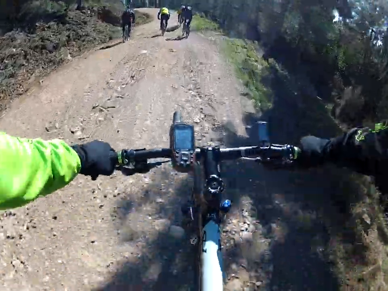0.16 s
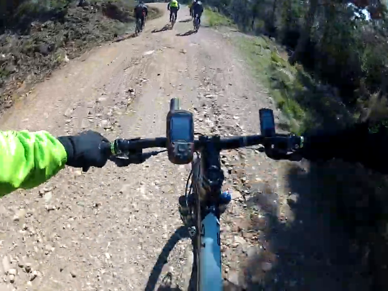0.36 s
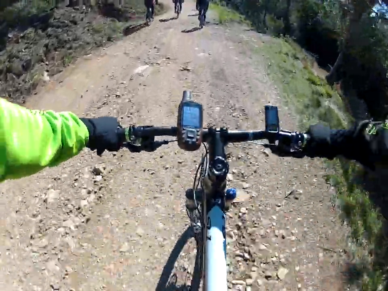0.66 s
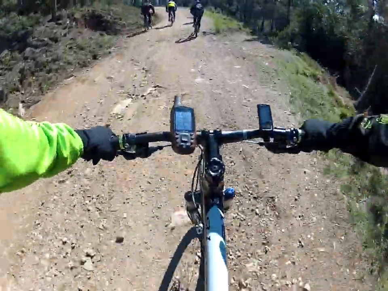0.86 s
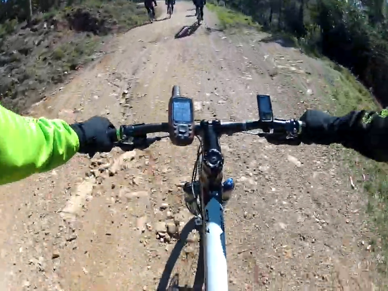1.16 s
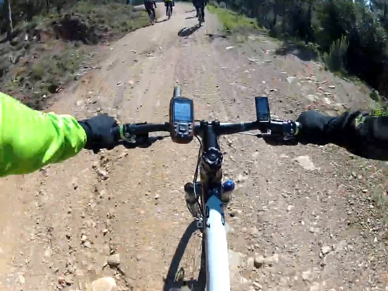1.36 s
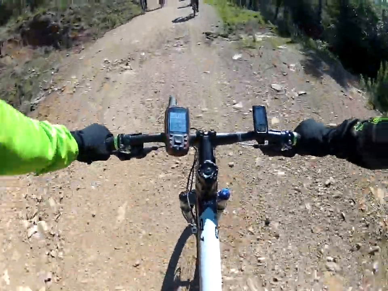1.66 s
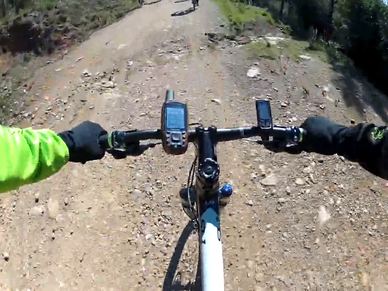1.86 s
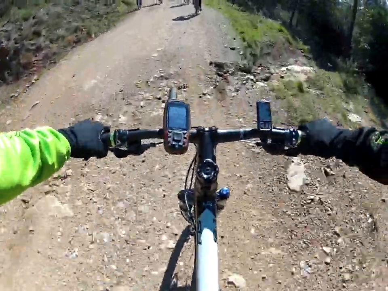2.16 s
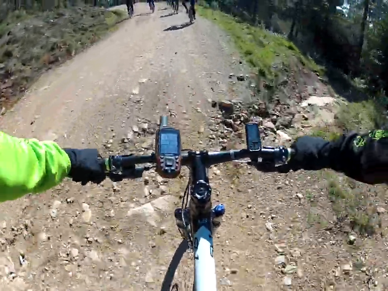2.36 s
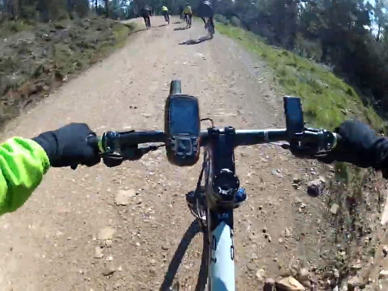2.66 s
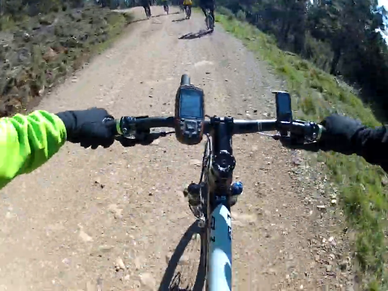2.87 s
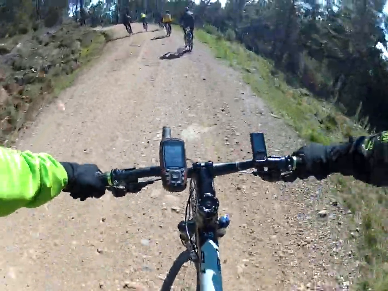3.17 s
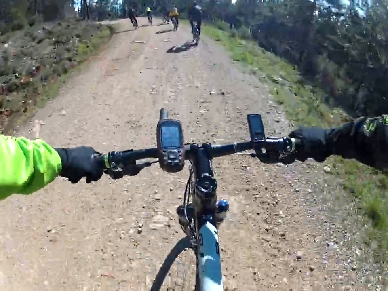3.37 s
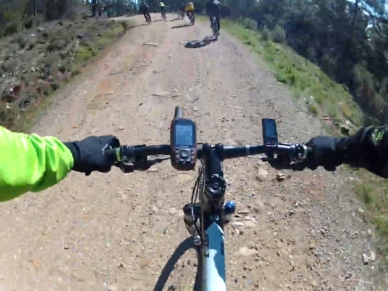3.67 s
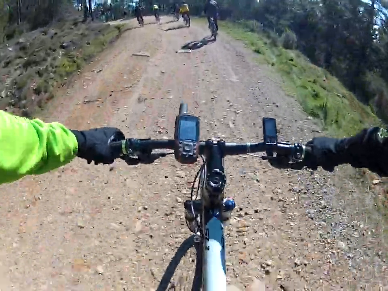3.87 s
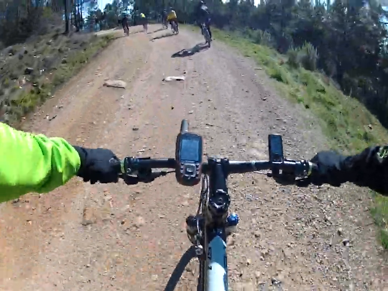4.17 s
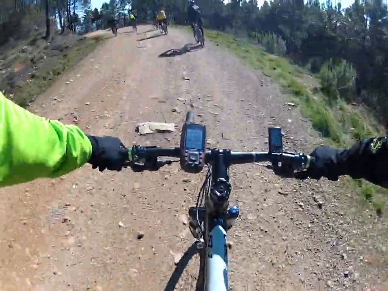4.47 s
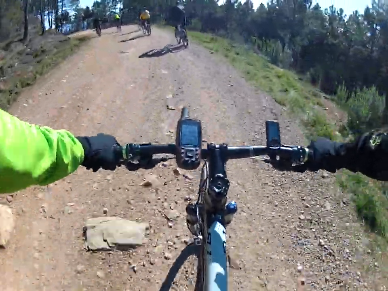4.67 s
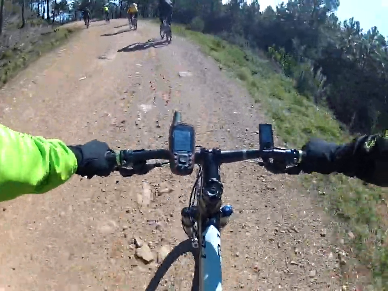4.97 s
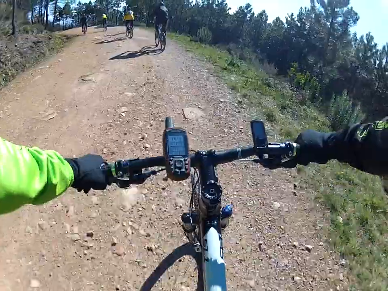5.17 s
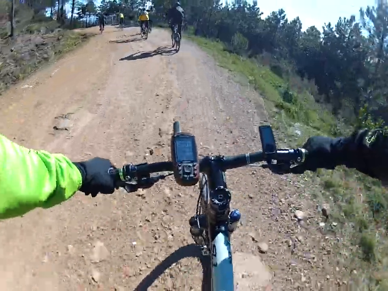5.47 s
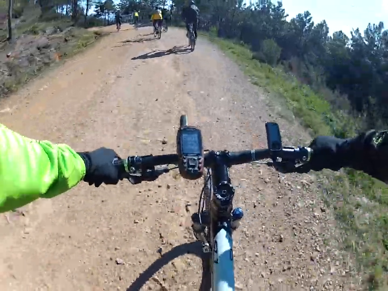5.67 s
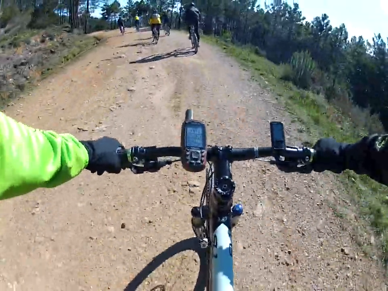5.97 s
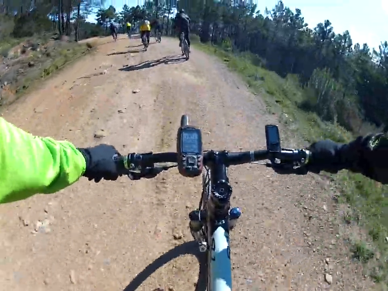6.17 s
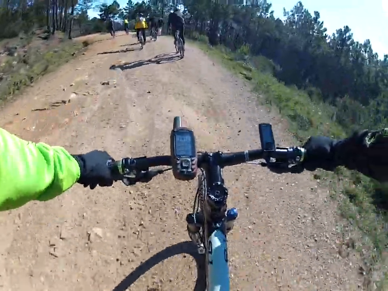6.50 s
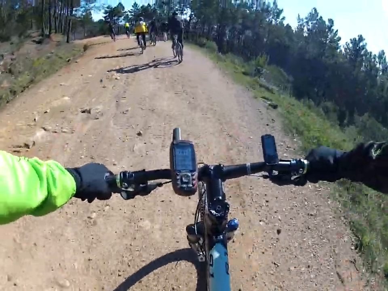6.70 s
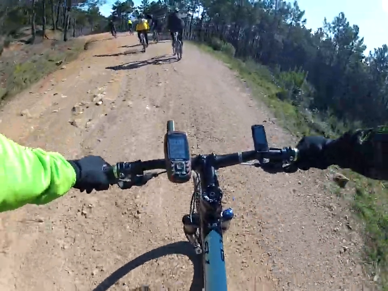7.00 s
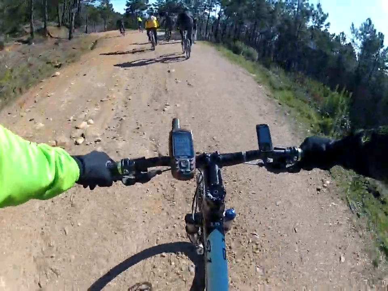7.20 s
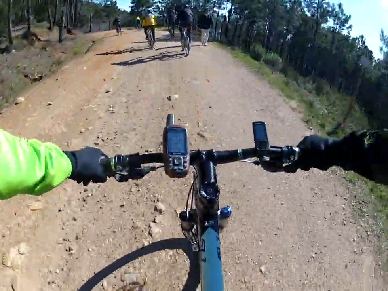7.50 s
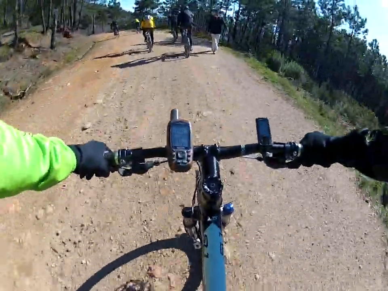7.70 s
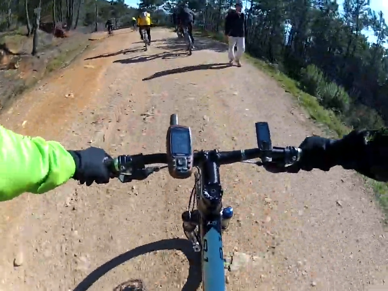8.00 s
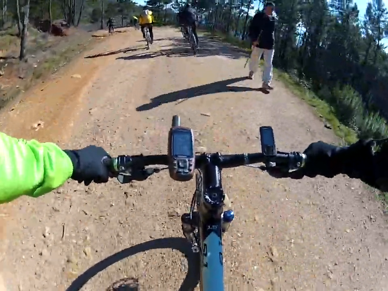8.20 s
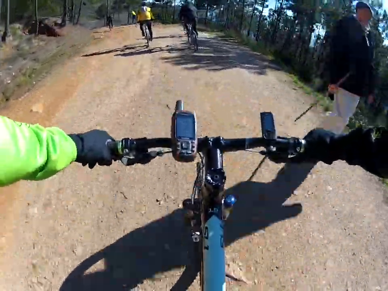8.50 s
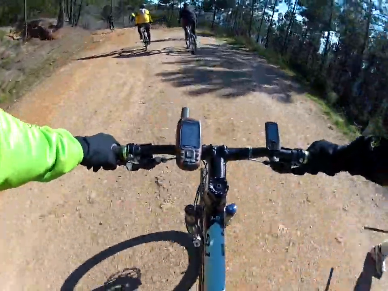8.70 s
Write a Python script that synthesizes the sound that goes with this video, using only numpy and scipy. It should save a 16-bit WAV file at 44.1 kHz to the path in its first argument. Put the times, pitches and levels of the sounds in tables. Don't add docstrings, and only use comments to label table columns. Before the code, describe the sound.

A bicycle rolls down a stony outdoor track, heard close and dry from inside a closed plastic case on the rider's chest. Throughout, low wind flutter and lumpy tyre rumble sit beneath a fine gritty rattle, faint harness creaks and a short hollow buzz from frame and stem. Sharp snaps and stone raps crowd 0.4-0.55 s, with a heavy frame thud near 0.53. More ticks follow at 1.3-1.7, including a hard click at 1.72. Scattered taps continue around 2.5 and 3.5. From 4.1 to 4.3 come bright double snaps and spitting grit. Coarse rumble eases after 4.4, while fine grit swells near 4.9. Brief air bumps push the case. Crisp raps cluster at 6.45-6.7, another falls at 7.04, a snap at 7.47, and rumble partly returns. Knocks at 8.25 and 8.82 close the still-moving ride. The treble is grainy and mirrored, without echo.

```python
import sys
import numpy as np
from scipy import signal
from scipy.fft import rfft, irfft, next_fast_len
from scipy.io import wavfile
from scipy.ndimage import uniform_filter1d, map_coordinates

SR = 44100
rng = np.random.default_rng(int(sys.argv[2]) if len(sys.argv) > 2 else 0)


def inscribe(sig):
    pcm = np.round(np.clip(np.atleast_2d(sig).T, -1, 1) * 32767)
    wavfile.write(sys.argv[1], SR, pcm.astype(np.int16))


def elevation(decibels):
    levels = np.asarray(decibels, float)
    return 10 ** (levels / 20)


N = 390285

# time in seconds, strength in dB.
WIND_STRENGTH = [(0.0, -28.5), (0.07, -38.5), (0.98, -34), (1.01, -43.5), (1.43, -36.5), (1.45, -30),
                 (1.53, -32), (3.01, -43), (5.05, -32.5), (5.2, -55), (5.27, -36), (5.35, -50), (5.49, -33),
                 (6.51, -45.5), (6.56, -30.5), (6.68, -47.5), (7.61, -36), (8.85, -41.5)]
# frequency in Hz, level in dB per Hz.
WIND_COLOUR = [(7.1, -42), (12, 7), (32, 2.5), (90, -23), (120, -41), (200, -120)]
# time in seconds, peak in dB, length in seconds.
CASE_BUMPS = [(0.264, -25, 0.0088), (0.507, -21, 0.0068), (1.442, -17.5, 0.0054), (3.901, -21, 0.0043),
              (4.46, -25, 0.012), (4.758, -15.5, 0.006), (4.987, -21, 0.008), (5.487, -29, 0.012),
              (6.16, -48, 0.0089), (6.32, -28.5, 0.011), (6.544, -38, 0.0068), (7.501, -33, 0.0071),
              (7.838, -30, 0.012), (3.995, -23.5, 0.011), (7.027, -34, 0.0079), (7.348, -28.5, .012),
              (8.077, -34, 0.0232)]
# time in seconds, coarse stones in dB, fine grit in dB.
TRACK_SURFACE = [(0.0, -50, -54.5), (0.71, -45.5, -53), (1.18, -52, -54.5), (1.53, -44.5, -53),
                 (1.95, -50, -51), (2.39, -47.5, -52), (4.07, -50.5, -52.5), (4.46, -59.5, -53),
                 (4.88, -55, -49), (6.11, -59, -54), (6.33, -56.5, -53.5), (6.56, -55.5, -52),
                 (6.97, -58.5, -57), (7.27, -50.5, -55), (7.49, -52, -53.5), (7.84, -55.5, -56),
                 (8.28, -51, -55.5), (8.85, -52, -58)]
# time in seconds, roughness in dB, half length in seconds.
TRACK_PATCHES = [(0.286, 4, 0.033), (0.382, -3.5, 0.035), (0.483, 6, 0.034), (0.652, -4, 0.027),
                 (0.744, 3, 0.034), (1.073, -1, 0.041), (1.363, 5.5, 0.043), (2.068, -3.5, 0.027),
                 (2.307, -3.5, .06), (2.5, 3.5, .05), (2.78, -4, 0.014), (2.93, 1, 0.072),
                 (3.57, -0.5, 0.029), (3.946, -2, 0.023), (4.165, 4.5, 0.05), (4.476, -1.5, 0.036),
                 (4.644, -3.5, 0.037), (5.37, -3, 0.14), (5.907, -2, 0.025), (6.116, 3, 0.032),
                 (6.597, 1, 0.046), (6.84, -5, 0.042), (7.323, -0.5, 0.067), (7.516, 2.5, .04),
                 (7.646, 2, 0.035), (8.184, 2, 0.12)]
# frequency in Hz, level in dB per Hz.
TYRE_COLOUR = [(32, -49), (55, 0.5), (110, -4), (190, -8), (245, -13.5), (330, -18.5), (400, -23),
               (660, -120)]

# frequency in Hz, width in Hz, level in dB.
HARNESS_RESONANCES = [(269, 79, -1.3), (365.6, 71, 0.23)]
TUBE_RESONANCES = [(392, 97, -5), (542, 143, -1.5), (744, 65, -0.5), (867, 142, -7.5)]
STEM_RESONANCES = [(1058.5, 80, 0)]
CASE_RESONANCES = [(1441, 127, -4), (1820, 256, -2.5), (2320, 144, 2.5), (2726, 377, -6), (3372, 240, -4),
                   (4140, 190, -12), (4600, 440, -17), (5210, 67, -16.5)]
COVER_RESONANCES = [(4100, 930, 5), (4670, 320, 2.5), (4790, 100, 7.5), (5390, 490, -2)]

# frequency in Hz, level in dB, time to fade by 60 dB in seconds.
FRAME_NOTES = [(506, -4.5, 0.021), (734, -6, 0.027), (1010, -3, 0.033)]
CLIP_NOTES = [(1552, 0, 0.026)]
SHELL_NOTES = [(1790, -7.5, 0.017), (2310, -9, 0.015)]
LID_NOTES = [(2880, 2.5, 0.018), (3320, 1.5, 0.024), (4060, -9, 0.021)]

# time in seconds, peak in dB, pitch in Hz, tyre thump share in dB.
FRAME_THUDS = [(0.267, -44, 393, -15), (0.421, -36, 241, -16), (0.526, -27, 500, 0.5),
               (0.694, -38, 240, -17), (1.304, -39.5, 360, 2), (1.667, -39, 296, 4.5),
               (1.722, -39, 248, -18), (2.093, -44, 240.6, -7), (2.124, -42, 555, -9),
               (3.092, -45, 283, -2), (3.218, -57, 285, -10.5), (3.455, -36.5, 283, -13),
               (3.55, -38, 318, -7), (3.625, -42.5, 367, -10), (4.041, -45, 357, -3), (4.119, -38, 300, -5),
               (4.558, -45, 290, -6), (4.893, -36, 320, -20), (5.835, -49, 293, -12.5),
               (8.09, -40, 600, -9)]
# time in seconds, peak in dB.
GRIT_SPITS = [(0.0084, -55), (0.439, -45), (0.4818, -49), (0.5402, -52), (1.419, -48), (1.7225, -42.5),
              (2.8529, -51), (2.937, -49), (3.039, -51), (3.347, -46.5), (3.5583, -46), (3.9294, -55),
              (4.0926, -41), (4.15, -36), (4.221, -38), (4.8253, -43), (4.907, -46.5), (7.4729, -53),
              (7.6256, -53), (8.249, -48.5)]
# time in seconds, peak in dB, shell over clip in dB,
# lid over clip in dB, struck spot in Hz.
CLIP_SNAPS = [(0.16, -42, -2, -1, 2120), (0.4834, -33.5, 1, -8, 1860), (0.5258, -28.5, 5.5, -26, 1790),
              (0.5404, -33, -9, -9, 1850), (1.4408, -32.5, -8, -13, 2340), (1.6706, -37, -3, -11, 2370),
              (1.7235, -27.5, -10, -7, 1850), (2.8562, -34.5, 0, -8, 1910), (3.037, -44.5, 1, 6.5, 2370),
              (3.718, -36.5, 3, -13, 2230), (4.0924, -27, -5, -5.5, 2810), (4.118, -44, 1, 7, 2120),
              (4.1532, -28, -6, -8, 2130), (4.221, -31, 1, 0, 2730), (4.2304, -37, 1, -9, 2330),
              (4.388, -38.5, -6, -2, 2760), (4.8913, -34, -8, -7, 1920), (4.9387, -32.5, -10, -6, 2300),
              (7.4739, -33.5, -13, -8, 2200), (8.2483, -32, -12, -13, 1900)]
# time in seconds, peak in dB, lid over shell in dB, struck spot in Hz.
SHELL_RAPS = [(0.396, -30, -6, 2400), (0.4344, -36, -13, 2280), (1.1603, -33.5, -12, 2300),
              (1.4187, -29, -7, 2300), (1.6154, -37, 2.5, 2690), (1.6916, -34, -3, 2330),
              (1.9724, -36.5, -5, 2340), (2.4678, -38, -11, 2360), (2.4902, -33, -3.5, 2320),
              (2.5306, -33, -7, 2240), (2.7174, -37.5, 2, 2330), (3.1812, -35.5, -3, 2310),
              (3.463, -32.5, -8, 2380), (3.5448, -27.5, -23, 2290), (4.1334, -33, -6, 2360),
              (4.2023, -38.5, -2, 2300), (4.3101, -30, -9, 2290), (4.591, -35, -19, 1940),
              (4.8279, -35.5, -6, 2380), (5.913, -29.5, -7, 2320), (6.33, -35.5, -18, 2310),
              (6.4637, -27, -6, 2320), (6.5016, -35, -17, 2320), (6.551, -29.5, -16, 2320),
              (6.6438, -27.5, -10.5, 2350), (6.6772, -33.5, -10, 2320), (7.0264, -38, -8, 2360),
              (7.0414, -30, -6.5, 2330), (8.332, -34, 2, 2270), (8.8174, -29, -6.5, 2370)]
# time in seconds, peak in dB, lid
# over shell in dB.
FURTHER_RAPS = [(0.8604, -37.5, -16), (1.0191, -38.5, -7), (1.1074, -37.5, -6), (1.1463, -38, -11),
                (1.3319, -31, -6), (1.3763, -34, -16), (1.8282, -35.5, -17), (2.0612, -38.5, -3),
                (2.2438, -42, 5), (2.3141, -38, -4.5), (2.3895, -38, -17), (2.9472, -44, -11),
                (3.876, -37.5, -3), (3.9703, -36.5, -4.5), (4.3715, -46, 4), (4.8614, -35, -10),
                (4.9092, -34.5, -10), (5.0335, -45, -8), (5.466, -37, -13), (5.6146, -38, -6),
                (6.542, -33.5, -13), (6.5916, -33.5, -10), (6.8229, -37, -12), (6.9238, -40, 2.5),
                (7.1576, -48, -17), (7.2845, -35.5, -16), (7.3477, -38, -8), (7.993, -37.5, -5),
                (8.2018, -44, -9), (8.2184, -39.5, -1)]

# frequency in Hz, level in dB.
CONVERTER_EDGE = [(300, -9), (450, 2), (5000, 0), (5600, 4), (6000, -2.5)]
# frequency in Hz, level in dB.
TREBLE_LIMIT = [(15250, 0), (15330, -11), (16300, -26)]

HOLD_HZ = 12000
PATCH_GRIT, PATCH_WIND = 0.85, 0.06
TYRE_DB, FRAME_DB, STEM_DB, RATTLE_DB = 2.5, -6.5, -8.5, 0.02
FRAME_STONES, STEM_STONES = 0.86, 0.31
PEBBLES_PER_S, PEBBLE_DB, PEBBLE_S = 45, -9, 0.0029
SPIT_T60_S, SPIT_DB, RAP_SPIT_DB = 0.038, 0.5, -26.5
USUAL_SPOT_HZ = 2310
RAP_CLIP_DB, TICK_CLIP_DB = -20.5, -16
CLIP_DB, SHELL_DB, LID_DB, SCRAPE_DB = 4.5, 2.5, 0.5, 10.5


def unit(x):
    return x / np.sqrt(np.mean(x ** 2) + 1e-20)


def along(points, hz):
    point_hz, point_db = np.transpose(points)
    return elevation(np.interp(np.log(hz + 1), np.log(point_hz + 1), point_db))


def curves(rows):
    s, *columns = np.transpose(rows)
    return [np.interp(np.arange(N) / SR, s, column) for column in columns]


def wobble(rate):
    knots = rng.standard_normal(int(N * rate / SR) + 4)
    return map_coordinates(knots, [np.arange(N) * rate / SR])


def filtered(x, response):
    size = next_fast_len(N + SR // 2)
    spectrum = rfft(x, size) * response(np.fft.rfftfreq(size, 1 / SR))
    return irfft(spectrum, size)[..., :N]


def resonances(modes):
    def response(f):
        total = 0
        for k, (centre, width, db) in enumerate(modes):
            peak = 1j * f * width / (centre ** 2 - f * f + 1j * f * width)
            total = total + (-1) ** k * elevation(db) * peak
        return total
    return response


def converter_edge(x):
    return filtered(x, lambda hz: along(CONVERTER_EDGE, hz))


def patchy(x, depth_db):
    z = signal.stft(x, nperseg=256)[2]
    field = uniform_filter1d(rng.standard_normal(z.shape), size=4, axis=0)
    field = uniform_filter1d(field, size=4, axis=1)
    return signal.istft(z * elevation(depth_db * unit(field)), nperseg=256)[1][:N]


def grit(rate, spread_db, smooth):
    chance, side, size = rng.random((3, N))
    strength = elevation(-spread_db * np.log(size + 0.17))
    taps = (chance < rate / SR) * np.sign(side - .5) * strength
    return np.sqrt(1 - smooth) * unit(taps) + np.sqrt(smooth) * rng.standard_normal(N)


def shaking(level_db, modes, clumps_db, rate, spread_db, smooth, patch_db):
    drive = elevation(clumps_db) * patchy(grit(rate, spread_db, smooth), patch_db)
    return elevation(level_db) * unit(filtered(drive, resonances(modes)))


def add_hit(out, s, modes, attack, detune):
    t = np.arange(SR // 10) / SR
    hz, level, t60 = np.transpose(modes)[:, :, None]
    strength, pitch, phase = rng.standard_normal((3, len(modes), 1))
    fade = elevation(level + 1.36 * strength - 60 * t / t60)
    ring = fade * np.sin(2 * np.pi * hz * (1 + detune * pitch) * t + 1.01 * phase)
    out[round(s * SR):][:len(t)] += ring.sum(0) * (1 - np.exp(-t / attack))


def bursts(rows, attack):
    out, t = np.zeros(N + SR), np.arange(SR // 16) / SR
    for s, db, t60 in rows:
        shape = elevation(db - 60 * t / t60) * (1 - np.exp(-t / attack))
        out[round(s * SR):][:len(t)] += shape * rng.standard_normal(len(t))
    return out[:N]


def wind(level_db):
    buffet = filtered(rng.standard_normal(N), lambda hz: along(WIND_COLOUR, hz))
    air = elevation(level_db + 0.5) * unit(elevation(0.71 * wobble(14)) * buffet)
    t = np.arange(N) / SR
    for s, db, length in CASE_BUMPS:
        u = (t - s - .02) / length
        air += elevation(db) * u * np.exp(-u * u / 2)
    return air


def patches():
    t = np.arange(N) / SR
    return sum(db * np.exp(-.5 * ((t - s) / half) ** 2) for s, db, half in TRACK_PATCHES)


def tyres(level_db):
    roll = filtered(grit(600, 3.9, smooth=0.69), lambda hz: along(TYRE_COLOUR, hz))
    return elevation(level_db + 1.6) * unit(elevation(0.77 * wobble(18)) * roll)


def harness(sway):
    clumps_db = 1.4 * sway + 1.2 * wobble(14)
    return shaking(-60.0, HARNESS_RESONANCES, clumps_db, 300, 0.99, smooth=0.55, patch_db=0.83)


def frame_hum(stones_db, grit_db, jolts):
    level_db = FRAME_STONES * stones_db + (1 - FRAME_STONES) * grit_db + FRAME_DB
    clumps_db = 1.4 * jolts + 1.52 * wobble(12)
    return shaking(level_db, TUBE_RESONANCES, clumps_db, 900, 4.3, smooth=0.71, patch_db=1.3)


def stem_hum(stones_db, grit_db, jolts):
    level_db = STEM_STONES * stones_db + (1 - STEM_STONES) * grit_db + STEM_DB
    return shaking(level_db, STEM_RESONANCES, 2.6 * jolts, 900, 2.8, smooth=0.78, patch_db=2.7)


def thuds():
    out = np.zeros(N + SR)
    for s, db, pitch_hz, thump_db in FRAME_THUDS:
        extra_db = .5 * (db + 30.5) + 1.5
        notes = [(hz, db + extra_db + level, t60) for hz, level, t60 in FRAME_NOTES]
        stone, thump = (pitch_hz, db - 0.5, .05), (110, db + thump_db + 8.5, .06)
        add_hit(out, s, notes + [stone, thump], attack=.0008, detune=.008)
    return out[:N]


def pebbles(grit_db):
    t = np.arange(SR // 50) / SR
    crumble = np.exp(-t / PEBBLE_S) * rng.standard_normal(len(t))
    hits = grit(PEBBLES_PER_S, 2.4, smooth=0)
    drive = hits + 0.42 * patchy(signal.fftconvolve(hits, crumble)[:N], 3.1)
    ring = filtered(drive, resonances(TUBE_RESONANCES + STEM_RESONANCES + CASE_RESONANCES))
    return elevation(grit_db + PEBBLE_DB) * unit(ring)


def spits():
    cover = resonances(COVER_RESONANCES)
    hiss = elevation(-76) * unit(filtered(rng.standard_normal(N), cover))
    rows = [(s, db + SPIT_DB, SPIT_T60_S) for s, db in GRIT_SPITS]
    rows += [(s, db + RAP_SPIT_DB, SPIT_T60_S) for s, db, *_ in SHELL_RAPS]
    return hiss + elevation(7) * filtered(bursts(rows, 0.00055), cover)


def case_rattle(grit_db, jolts):
    clumps_db = 1.26 * jolts + 2.0 * wobble(60)
    return shaking(grit_db + RATTLE_DB, CASE_RESONANCES, clumps_db, 1400, 3.8, smooth=0.25, patch_db=2.15)


def knocks():
    out = np.zeros(N + SR)
    blows = [(s, db, db + shell, db + lid, spot) for s, db, shell, lid, spot in CLIP_SNAPS]
    blows += [(s, db + RAP_CLIP_DB, db, db + lid, spot) for s, db, lid, spot in SHELL_RAPS]
    blows += [(s, db + TICK_CLIP_DB, db, db + lid, USUAL_SPOT_HZ) for s, db, lid in FURTHER_RAPS]
    scrapes = []
    for s, clip_db, shell_db, lid_db, spot_hz in blows:
        parts = [(CLIP_NOTES, clip_db + CLIP_DB),
                 (SHELL_NOTES + [(spot_hz, 0, .018)], shell_db + SHELL_DB),
                 (LID_NOTES, lid_db + LID_DB)]
        notes = [(hz, share + level, t60) for part, share in parts for hz, level, t60 in part]
        contact = 0.0007 * elevation(-.6 * (max(clip_db, shell_db) + 27.5))
        add_hit(out, s, notes, contact, detune=.012)
        scrapes.append((s, lid_db + SCRAPE_DB, .032))
    scrape = patchy(bursts(scrapes, 0.0029), 3.2)
    return out[:N] + filtered(scrape, resonances(CASE_RESONANCES))


def scene():
    buffet_db, = curves(WIND_STRENGTH)
    stones_db, grit_db = curves(TRACK_SURFACE)
    rough_db = patches()
    sway = wobble(9)
    jolts = wobble(32)
    stones_db = stones_db + rough_db + 1.04 * sway
    grit_db = grit_db + PATCH_GRIT * rough_db
    gusts_db = buffet_db + PATCH_WIND * rough_db + 1.24 * sway + 0.46 * wobble(5.5)
    soft = wind(gusts_db) + tyres(stones_db + TYRE_DB) + harness(sway) + thuds()
    hard = frame_hum(stones_db, grit_db, jolts) + stem_hum(stones_db, grit_db, jolts)
    hard += pebbles(grit_db) + spits() + case_rattle(grit_db, jolts) + knocks()
    return (soft + converter_edge(hard))[None]


def band_limit(x):
    return signal.sosfilt(signal.butter(12, 15950, fs=SR, output="sos"), x)


def record(dry):
    base = filtered(dry, lambda hz: hz < HOLD_HZ / 2)
    mirrored = base * (1 + 2 * np.cos(2 * np.pi * HOLD_HZ * np.arange(N) / SR))
    held = filtered(mirrored, lambda hz: np.sinc(hz / HOLD_HZ) * along(TREBLE_LIMIT, hz))
    return band_limit(held)


dry = scene()
out = record(dry)
inscribe(out)
```